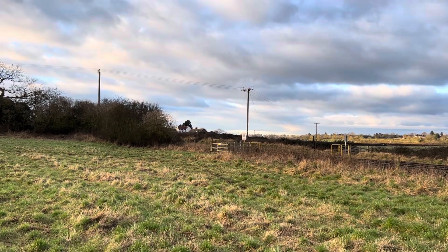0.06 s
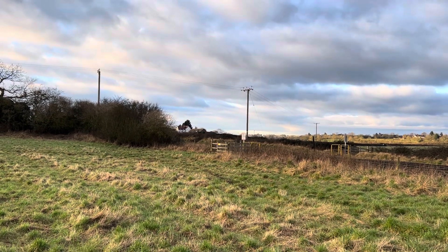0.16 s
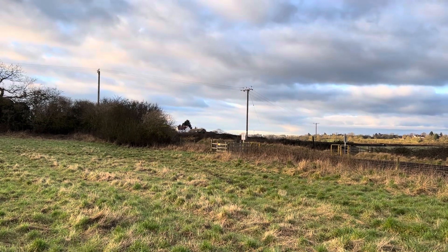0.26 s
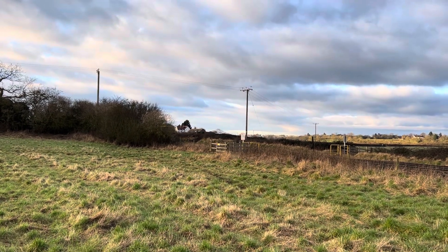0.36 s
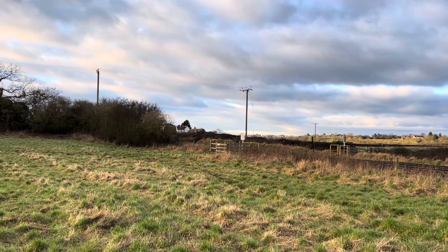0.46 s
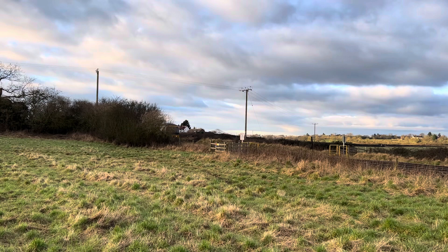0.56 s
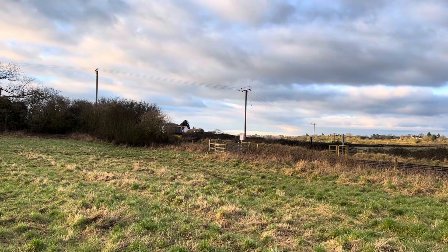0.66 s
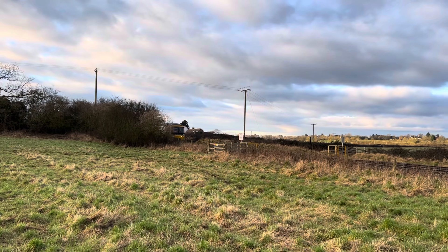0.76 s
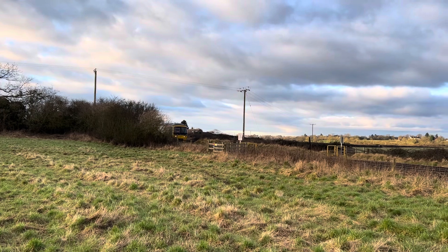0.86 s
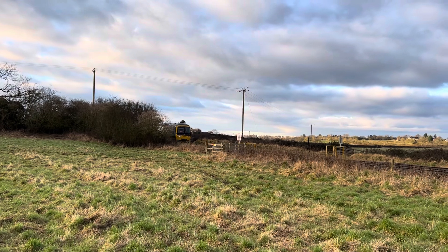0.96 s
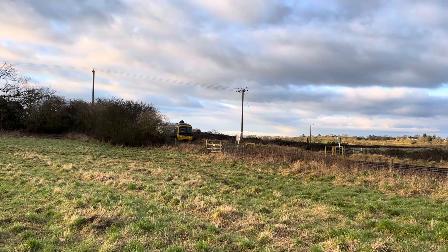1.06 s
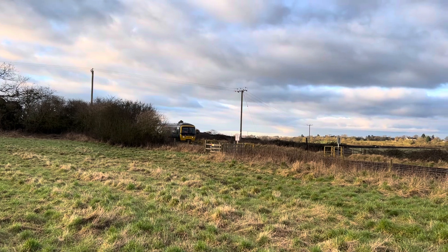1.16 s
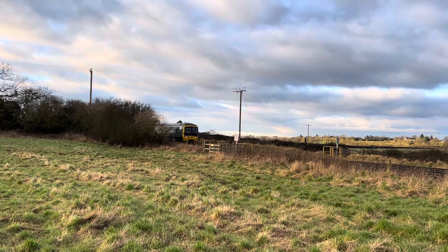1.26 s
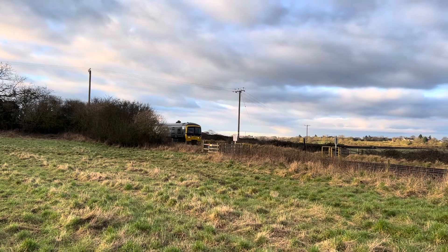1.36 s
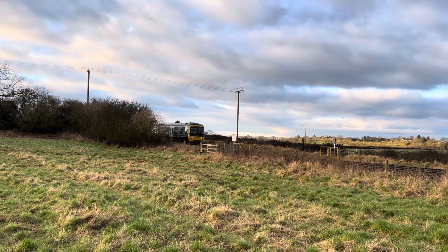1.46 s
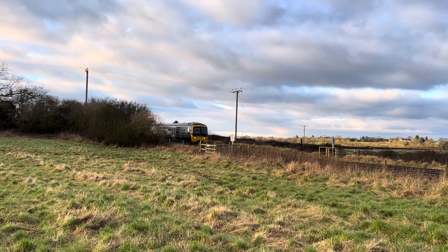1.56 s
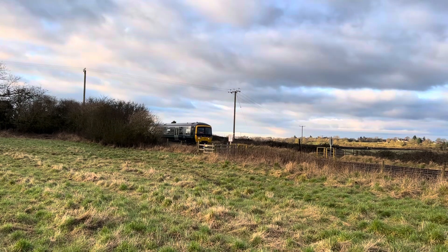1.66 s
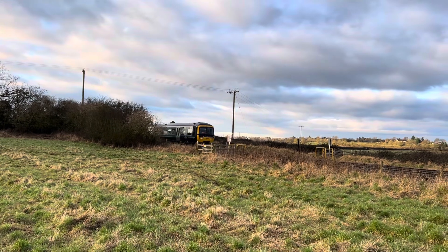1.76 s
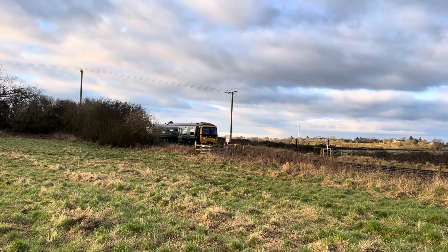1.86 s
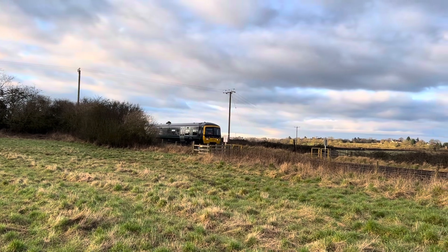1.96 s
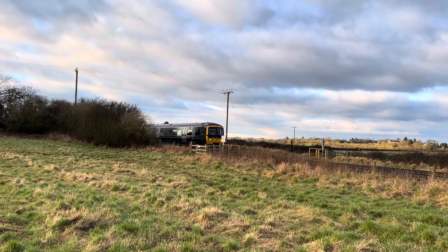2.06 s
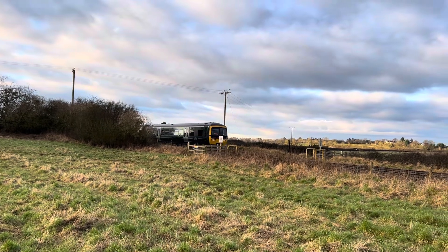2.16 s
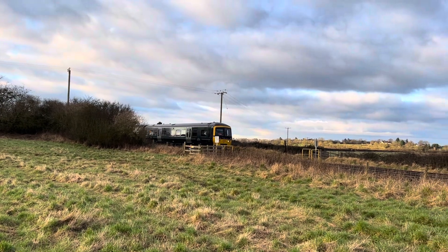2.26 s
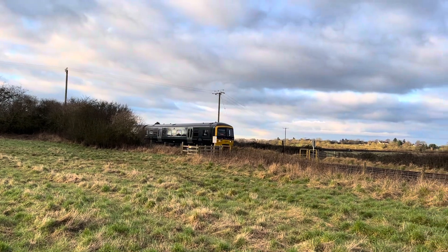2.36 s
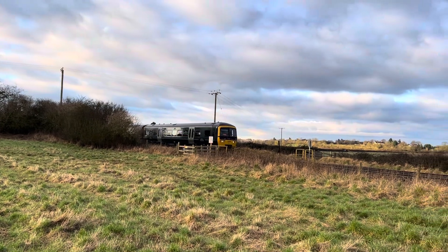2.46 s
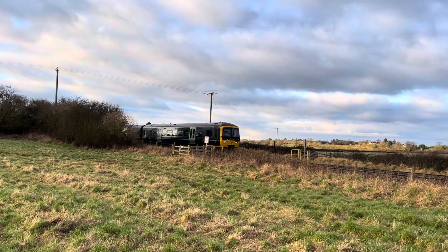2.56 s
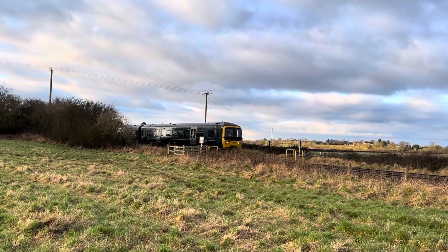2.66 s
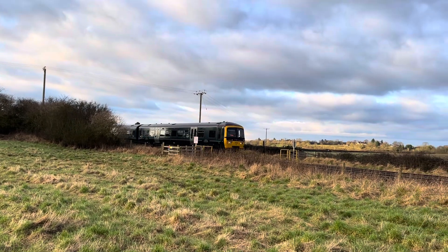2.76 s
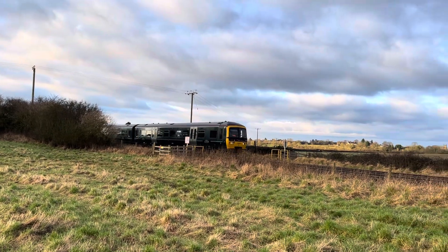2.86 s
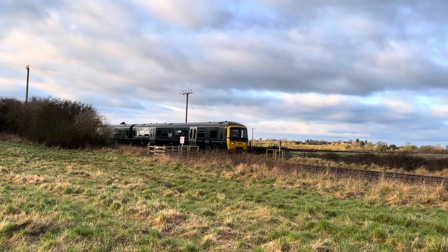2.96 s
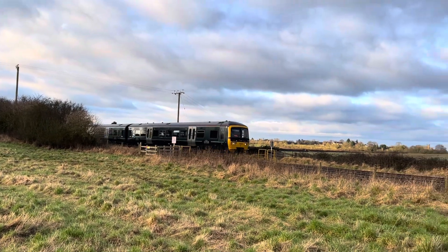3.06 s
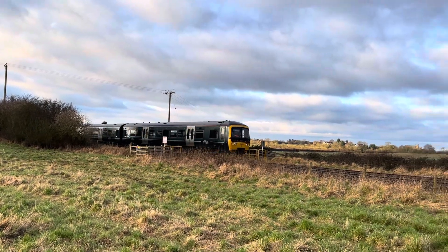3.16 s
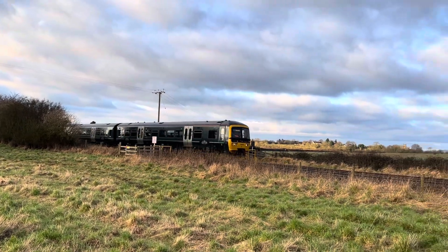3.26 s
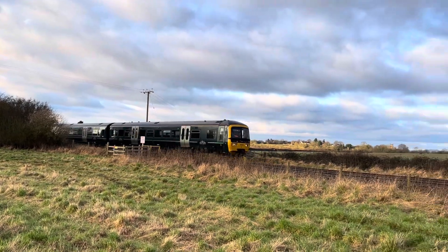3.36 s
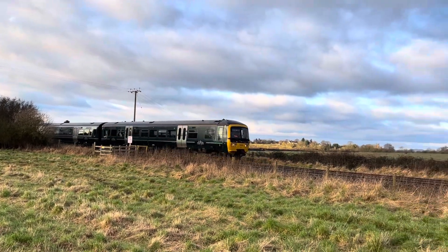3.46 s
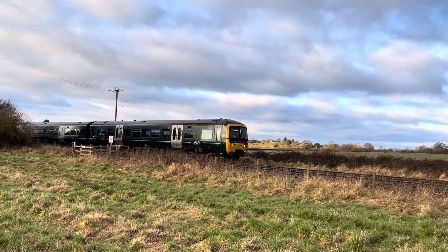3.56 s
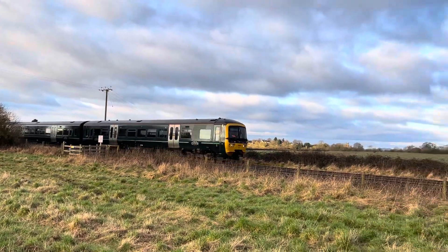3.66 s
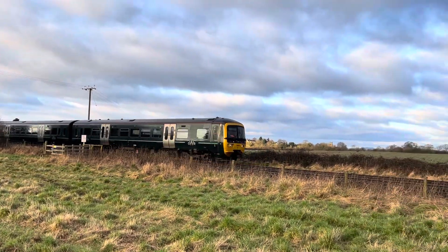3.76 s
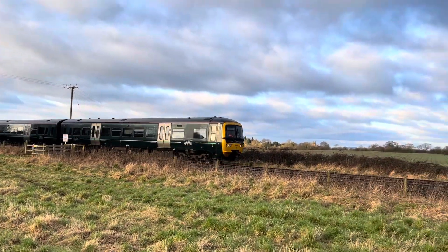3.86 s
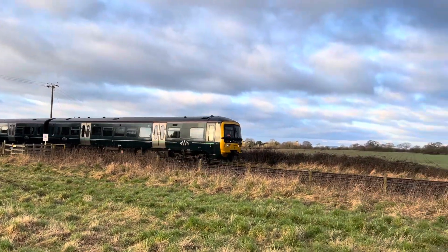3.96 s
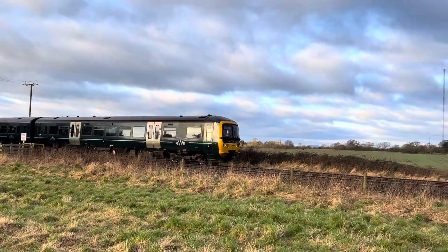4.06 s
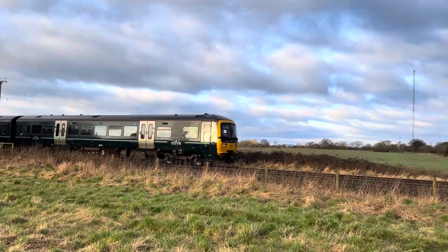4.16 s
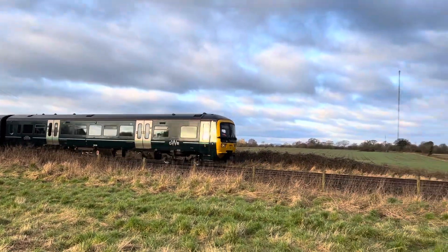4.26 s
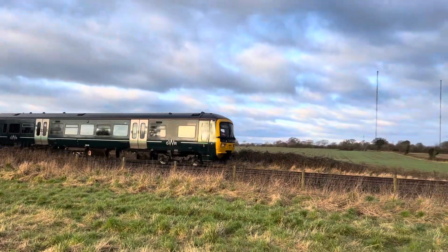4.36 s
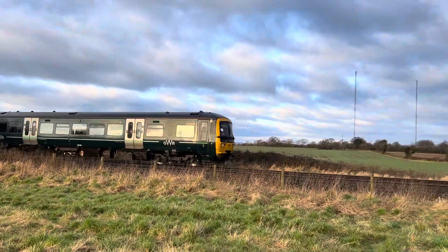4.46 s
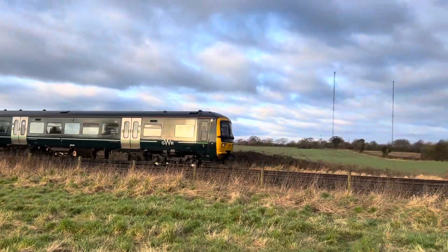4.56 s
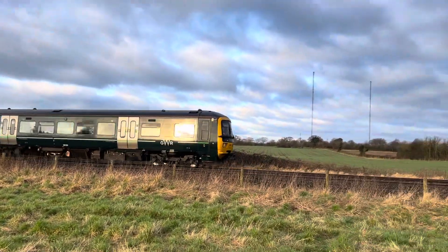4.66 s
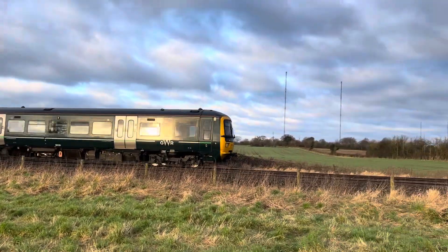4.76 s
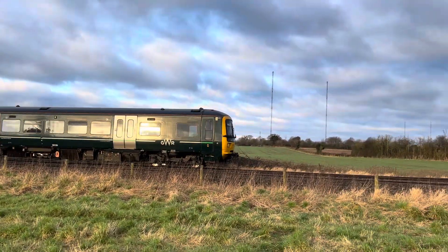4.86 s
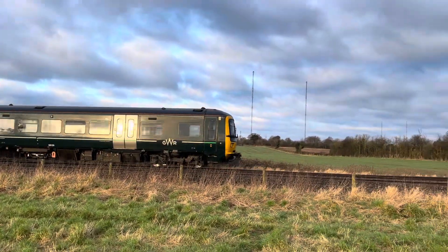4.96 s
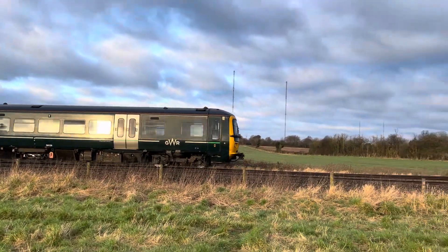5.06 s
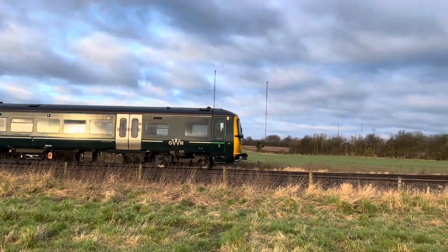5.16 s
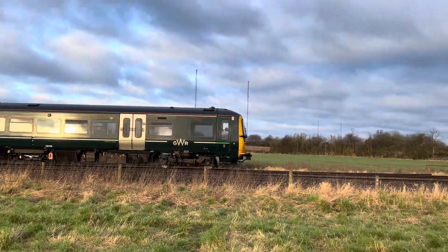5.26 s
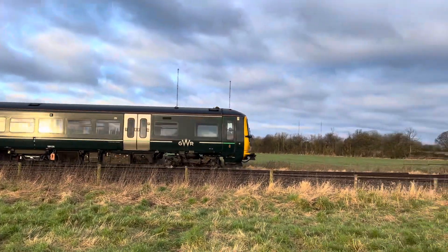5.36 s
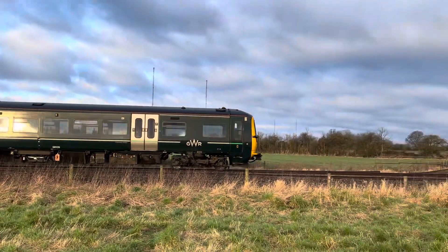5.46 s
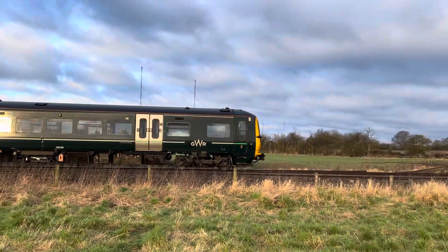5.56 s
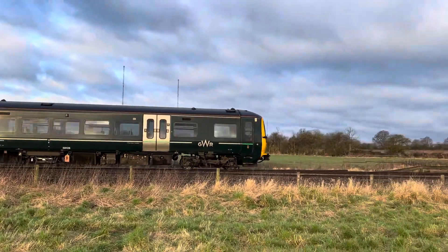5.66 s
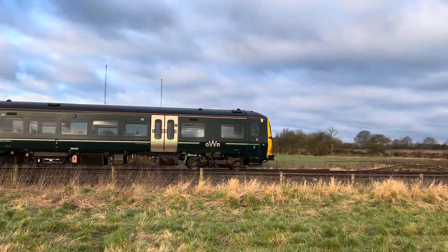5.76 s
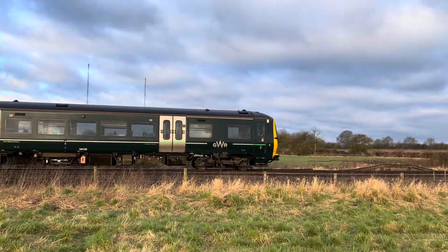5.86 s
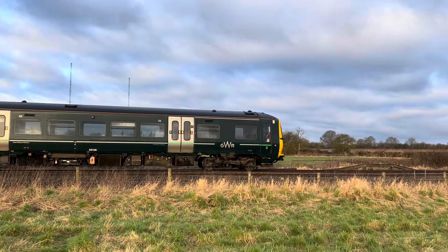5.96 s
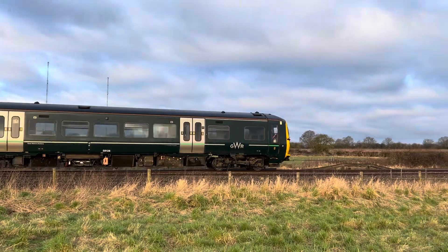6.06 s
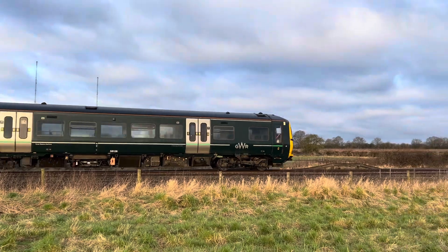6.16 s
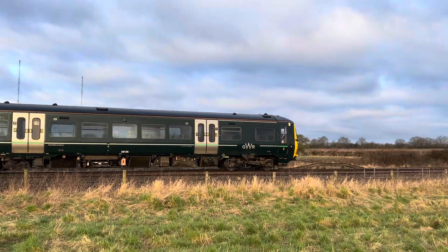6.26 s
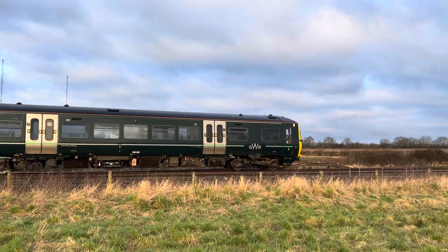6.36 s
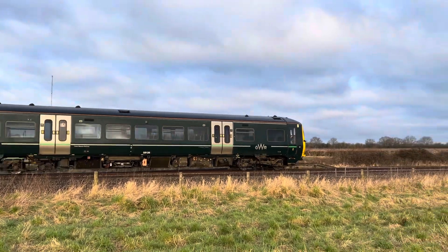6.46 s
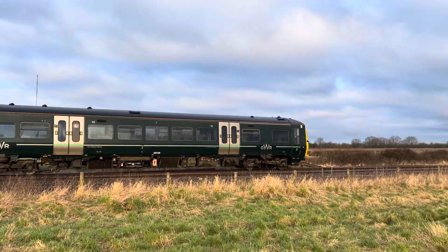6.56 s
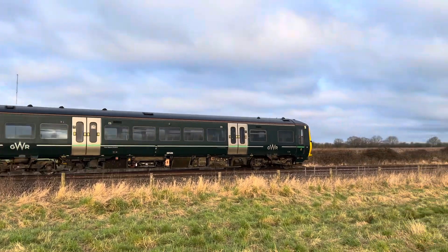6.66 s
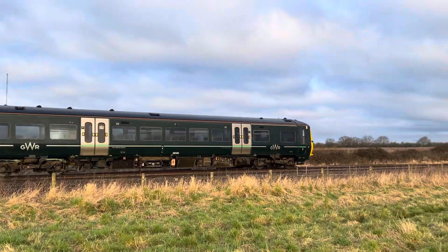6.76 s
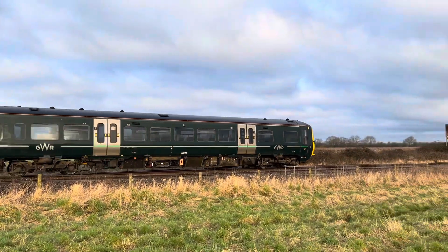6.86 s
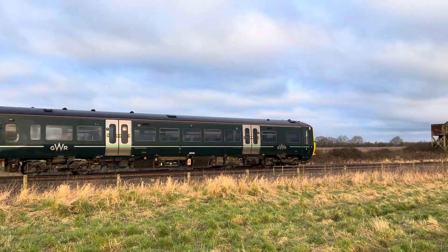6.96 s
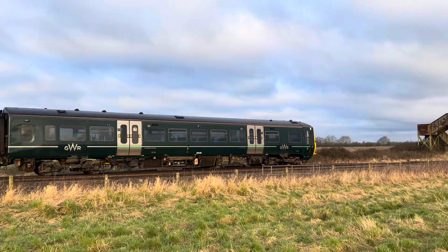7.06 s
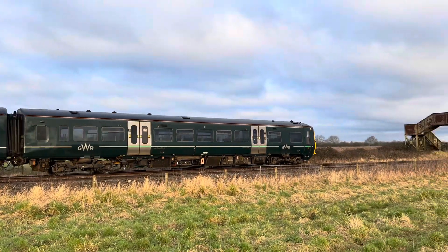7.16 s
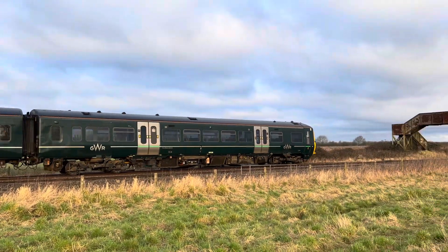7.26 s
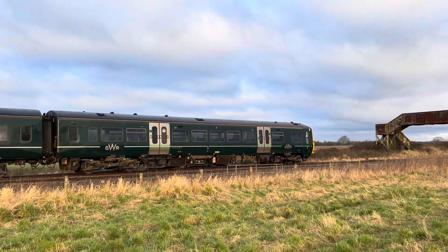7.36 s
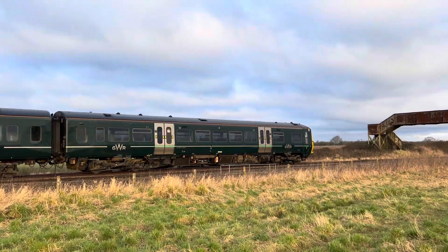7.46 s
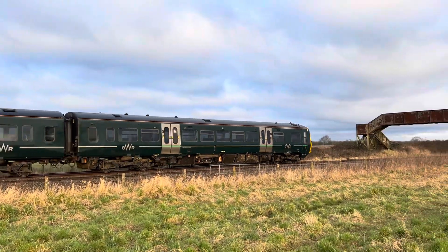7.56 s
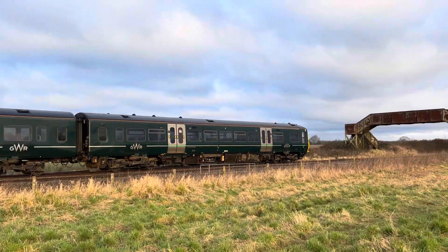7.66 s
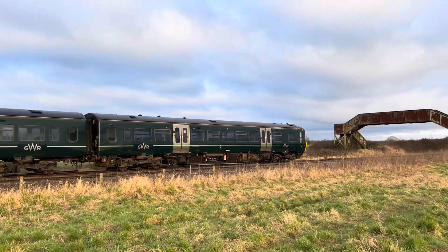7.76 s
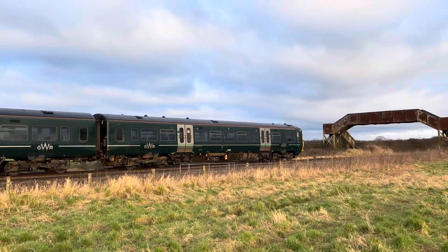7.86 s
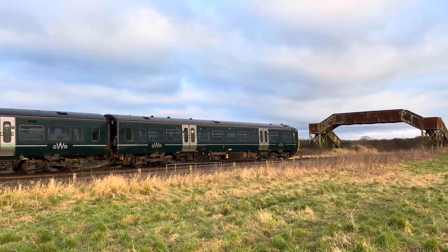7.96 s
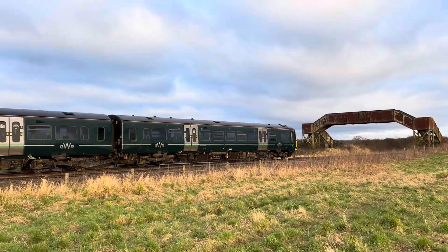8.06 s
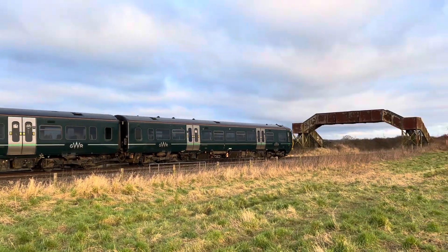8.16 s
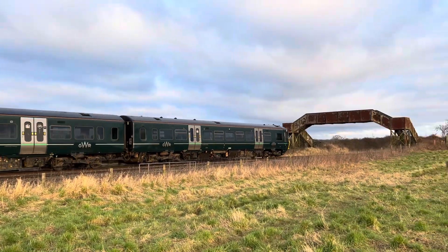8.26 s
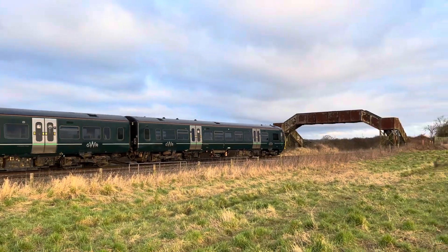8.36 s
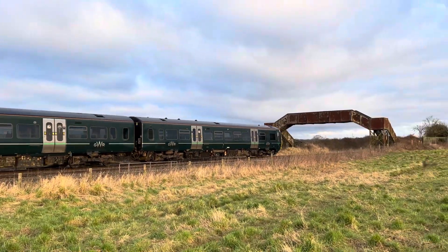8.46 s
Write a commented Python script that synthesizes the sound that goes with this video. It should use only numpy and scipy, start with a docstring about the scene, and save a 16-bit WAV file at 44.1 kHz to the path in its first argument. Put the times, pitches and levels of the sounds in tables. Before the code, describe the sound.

Outdoors beside a field, a diesel train approaches from behind a hedge, first a faint, dull roar with a low engine hum and fast wheel thudding. It swells and brightens as it nears, adding heavy bogie thumps, rail knocks, hiss and metallic ticks. Engine pitch sinks slightly as the cars pass. A stereo microphone stands across the grass; the train is still loud at the end.

```python
"""A diesel railcar train rolls slowly past, heard across a grass field by a stereo microphone pair.
Underfloor engines hum as stacks of sines; wheels thud over sleepers, thump and knock as short tones.
Roar, rail ring, hiss, sizzle, clatter and rumble are shaped noise from random short-time spectra.
The treble opens as the train leaves a hedge and draws near, and engine and ring pitches sink as it passes."""
import sys
import numpy as np
from scipy import signal
from scipy.io import wavfile
from scipy.ndimage import uniform_filter1d

SR = 44100
rng = np.random.default_rng(int(sys.argv[2]) if len(sys.argv) > 2 else 0)


def pcm_store(signal):
    """Save signal as 16-bit PCM."""
    levels = np.round(np.clip(np.atleast_2d(signal), -1, 1) * 32767)
    wavfile.write(sys.argv[1], SR, levels.astype(np.int16).T)


N = 375291  # length in samples

# the pass: time_s, distance_loss_db, rumble_level_db, hiss_level_db
PASS = [(0, -18.5, -34.5, -67), (.7, -18, -34.5, -59), (1.5, -16.5, -32.5, -55), (2.1, -14.5, -34, -52),
        (2.5, -13, -27, -50.5), (3.05, -11, -31.5, -47), (3.55, -8, -27, -43.5), (4.3, -5.5, -21, -39.5),
        (5, -3.5, -20, -34), (5.5, -1, -18.5, -32), (6.2, -.5, -19, -32), (6.9, 0.5, -20, -33.5),
        (7.8, -0.5, -21, -35.5), (8.51, -1, -24.5, -36)]
# engine pitch falling as the train passes: time_s, pitch_factor
SINK = [(0, 1), (4.3, .9972), (5.3, .985), (6.8, .978), (8, .954), (8.51, .9515)]
# half the firing rate of the faster engine, firing rate of the slower (before the pitch sinks)
ENGINE_HZ, IDLER_HZ = 20.92, 35.55
# engines of several cars beat, so each order swells:
# multiple, mean_level_db (before distance loss), swing_db, period_s, crest_s
BEATS = [(2, -33.5, 3.5, 5, 7.4), (3, -34, 3.5, 2.4, 7.55), (4, -33.5, 4.5, 1.97, 7.53)]
# upper engine orders: multiple, level_db (over multiple 4)
ENGINE_UPPER = [(5, -8), (6, -6), (11, -12)]
# a share is the part of the distance loss that a layer follows
ENGINE_SHARE, IDLER_DB, IDLER_SHARE = 0.81, -38, 0.49

# wheels over the sleepers as the train slows: time_s, rate_hz (thuds a second)
SLEEPER_RATE = [(0, 19.32), (1, 18.73), (2, 18.19), (3, 17.85), (5.5, 17.46), (6, 17.23), (7, 16.65),
                (8.1, 16.12), (8.51, 15.8)]
# tone of the thud: freq_hz, level_db
THUD = [(35, -34), (55, -3), (75, 4), (130, 2), (165, -3), (203, 4.5), (222, -15), (240, -9), (300, -10.5),
        (350, -22)]
# the eleventh multiple of the thud stands out as a hum: time_s, level_db
HUM = [(0, -61.5), (2.1, -46.5), (3, -59), (4.6, -37), (6, -33), (6.9, -33), (7.25, -30), (7.55, -29.5),
       (7.8, -29), (8.15, -21), (8.27, -49), (8.51, -35)]
THUD_DB, THUD_SHARE = -41.5, 0.39
DULL_PER_DB = 1.5  # dB lost per 100 Hz for each dB of distance loss

# heavy single thumps from the bogies: centre_s, level_db, pitch_hz
THUMPS = [(0.204, -22, 84.5), (0.433, -22, 74.6), (1.15, -22.5, 99), (1.383, -18.5, 88.5), (1.549, -21, 87),
          (1.651, -23, 99), (1.819, -24, 95), (2.039, -21, 89), (2.207, -18.5, 106), (2.415, -20, 108),
          (2.544, -19, 107), (2.685, -16, 100), (2.921, -18, 91), (3.381, -19.5, 78), (3.48, -15, 80),
          (3.72, -18.5, 100), (3.993, -15, 98), (4.053, -10.5, 95), (4.225, -14.5, 85), (4.294, -19, 93),
          (4.392, -14, 89.5), (4.598, -15, 118), (4.646, -12.5, 92), (4.752, -11, 155), (4.99, -16, 85.6),
          (5.095, -16, 100), (5.35, -13, 109), (5.512, -12, 174), (5.625, -15.5, 130), (5.704, -11, 85.5),
          (5.794, -9.5, 140), (5.869, -11.5, 84), (5.971, -11.5, 125), (6.229, -10, 103), (6.32, -8.5, 145),
          (6.402, -16.5, 102), (6.456, -10.5, 98), (6.496, -6, 137), (6.634, -10.5, 117),
          (6.677, -8.5, 123), (6.752, -15, 121), (6.811, -13.5, 133), (6.85, -8, 111), (6.933, -11, 105),
          (6.998, -9, 108), (7.038, -8.5, 141), (7.109, -12.5, 98), (7.174, -13, 128), (7.216, -9.5, 112),
          (7.583, -12.5, 115), (7.707, -10, 92), (7.796, -12, 118), (7.893, -11.5, 95.5), (8.091, -11, 125)]
STRAY_DB, STRAY_HZ, STRAY_SHARE = -20, 102, 1  # extra thumps at chance moments

# wheels knock on the rail: start_s, level_db, pitch_hz
KNOCKS = [(3.348, -28, 245), (3.911, -21.5, 657), (4.081, -28, 242), (4.415, -17.5, 240), (4.708, -20, 243),
          (4.887, -24, 250), (5.1, -22, 242), (5.61, -17.5, 261), (5.79, -20, 242), (5.959, -22, 288),
          (6.305, -19, 240), (6.487, -17, 250), (6.67, -12.5, 266), (6.739, -23, 241), (6.838, -22, 276),
          (7.03, -19, 240), (7.203, -20, 279), (7.301, -30, 287), (7.453, -30, 245), (7.948, -26, 355),
          (8.13, -33, 250)]
# modes of a knock: pitch_ratio, level_db
KNOCK_MODES = [(1, 0), (1.7, -11), (2.6, -28)]
KNOCK_RISE_S, KNOCK_T60_S = 0.0025, 0.063

# tone of the roar behind the hedge, then abreast: freq_hz, density_db (per Hz)
FAR = [(200, -32), (300, -17), (400, 0.5), (600, 5), (850, 3), (1200, -3), (1600, -9.5), (1900, -13.5),
       (2300, -16), (2600, -23), (3000, -42), (3800, -98)]
NEAR = [(200, -4.5), (300, -1.5), (400, -6.5), (560, -2), (700, -3.5), (900, 0), (1200, -2.5), (1600, -4),
        (2000, -5), (2450, -6.5), (2800, -20), (3800, -32)]
# brightness of the roar, from behind the hedge to abreast: time_s, near_share (0-1)
OPEN = [(.5, 0), (1.5, 0.67), (3.2, 0.83), (4.1, 0.65), (5.5, 0.7), (8.51, 0.97)]
ROAR_DB = -25
# the roar surges and slackens: centre_s, change_db
SURGES = [(4.92, 3.5), (5.21, -1), (6.18, 2), (6.2, -3), (6.33, 2.5), (6.375, 0), (6.48, 0), (6.6, 1),
          (6.68, 1.5), (6.8, 3.5), (7.03, 2), (7.08, -0.5), (7.18, -3), (7.21, 1.5), (8.27, -3.5)]
SURGE_S = 0.013  # half-length
# short rail ticks that brighten roar and hiss: centre_s, lift_db, half_length_s
TICKS = [(3.916, 3, 0.0037), (6.81, 0.5, .008), (7.672, 2.5, 0.0071)]

# finer strands in the rail ring: freq_hz, width_hz, lift_db
RING_LINES = [(578, 25, 13), (835, 14, 9), (939, 11, 11), (1016, 14, 6.5)]
RING_HZ, RING_DB, RING_SHARE = 875, -41.5, 0.83
# the rail ring swells while the wheels are nearest
RING_SWELL_DB, RING_SWELL_S, RING_SWELL_LENGTH_S = 9.5, 6.63, 1.6

# treble noise, with two narrow gaps near 10 and 13.5 kHz left by lossy coding:
# freq_hz, density_db (per Hz)
HISS_TONE = [(2300, -18), (2750, 0.5), (3600, -0.5), (4700, 0), (5400, -6), (7200, -2), (8800, -3),
             (10000, -25), (11500, 1), (13500, -37), (15000, -1)]
# lift of the hiss above TREBLE_HZ: time_s, lift_db
TREBLE = [(0, 10.5), (1, 6.5), (2.3, 4.5), (2.7, 0), (3.3, 2), (3.7, 3), (4.1, 1), (5, 0.5), (6.5, -2),
          (8.51, -2)]
TREBLE_HZ = 5100
# a dip in the hiss that turns to a hump as the bearing swings, then evens out: time_s, change_db
DIP = [(0, -11), (1, -9.5), (2.4, -5), (3.2, 5), (3.7, 1), (4.1, 0.5), (8.51, 0)]
DIP_HZ, DIP_WIDTH_HZ = 6240, 510
ABREAST_S, AIR_DB_PER_S2 = 5.89, 0.89  # air loss at 10 kHz grows with the square of time from abreast

# a bright band of rail sizzle that moves with the bearing: time_s, centre_hz, level_db
SIZZLE = [(0, 2260, -72), (1.2, 2250, -58), (2, 2200, -58), (2.9, 2200, -56), (3.2, 2120, -50),
          (3.45, 1960, -47), (3.7, 1900, -44), (4.2, 1900, -62), (4.6, 2350, -46.5), (5.1, 2350, -40.5),
          (5.65, 2380, -38), (6.05, 2420, -45), (6.35, 2140, -50), (7, 2130, -45), (7.7, 2140, -39),
          (8.51, 2220, -36)]
# brief metallic clatter: centre_s, level_db, centre_hz, half_length_s
CLATTER = [(3.915, -52, 10900, .008), (3.918, -47, 8300, 0.011), (3.97, -50, 4500, .008),
           (4.028, -49, 4400, .014), (5.79, -38, 2400, .01), (5.965, -33, 2300, 0.0086),
           (6.735, -46, 4500, .008), (7.563, -38, 2300, .008), (8.228, -39, 2300, .008)]

# tone of the low rumble: freq_hz, density_db (per Hz)
RUMBLE_TONE = [(22, -40), (34, -31), (50, -23), (62, 5), (91, 2.5), (130, 0.5), (200, -4), (235, -8.5),
               (287, -21), (350, -24.5), (500, -94)]
# the upper rumble swells once as the train leaves the hedge
SWELL_HZ, SWELL_DB, SWELL_S, SWELL_LENGTH_S = 146, 7, 2.32, 1
BOOM_HZ, BOOM_DB, BOOM_SHARE = 194.1, -27, 0.95
BOOM_SAG_S, BOOM_SAG_HZ_PER_S = 5.7, 6.5  # the boom sinks from this time on
# brief swells and lulls of the low noise, placed by hand: centre_s, change_db, centre_hz
LOW_SWELLS = [(4.14, -5, 190), (4.4, 2, 65), (4.51, -7, 80), (4.6, 7, 194), (4.65, 1.5, 85), (4.92, 3, 148),
              (4.94, -2, 80), (5.16, -6, 190), (5.59, -8, 85), (5.82, -8, 90), (5.88, 3, 85), (6.1, -2, 90),
              (6.55, -3.5, 190), (7.34, -4.5, 190), (7.46, -0.5, 85), (7.6, 8.5, 110), (7.7, 2, 70),
              (7.87, 8, 80), (8.1, -1, 80), (8.24, 0, 190), (8.3, 9, 110)]
LOW_SWELL_S, LOW_SWELL_WIDTH = 0.039, 0.17  # half-length, and width as a share of the centre

# moving notches in the treble, perhaps from the recorder's own body, changing with bearing:
# time_s, spacing_hz, strength (0-1)
NOTCHES = [(0, 625, 0.3), (1.5, 640, 0.43), (3, 642, 0.25), (3.6, 550, 0.46), (4.2, 538, 0.2),
           (5.2, 546, 0.3), (6.3, 560, 0.1), (8.51, 594, 0.07)]
# treble dips and humps while the train is far off: freq_hz, width_hz, change_db
FAR_COLOUR = [(2250, 50, 3.5), (2510, 110, -8), (3420, 180, -3.5), (4170, 200, 1.5)]
FAR_GLIDE = .2  # share by which that colour sinks in pitch during the swing
# the bearing swings round between these times: start_s, end_s
TURN_S = (3.3, 4.4)
# likeness of the two channels, far then abreast; above 9 kHz simply taken as unrelated:
# freq_hz, likeness (0-1)
SAME_FAR = [(100, .99), (400, .95), (750, .75), (1100, .85), (1500, .9), (2000, .7), (2500, .62),
            (3500, .85), (5000, .78), (7000, .75), (8300, .6), (9000, 0)]
SAME_NEAR = [(100, .99), (400, .96), (800, .85), (1100, .76), (1500, .5), (1850, .3), (2200, .6),
             (2500, .72), (3500, .65), (5000, .6), (7000, .68), (8300, .55), (9000, 0)]
# level between the channels, far then abreast: freq_hz, left_minus_right_db
TILT_FAR = [(60, -2), (250, -4), (450, -0.5), (750, -4), (1200, 2), (1600, -4), (1950, 2.5), (2300, -3),
            (2700, 4.5), (5000, 1.5), (7000, 0)]
TILT_NEAR = [(60, -2), (250, -4.5), (500, -1), (1100, 1.5), (1500, -1), (1850, -5.5), (2300, -2),
             (3000, 3.5), (5000, 3), (7000, -1), (9000, 0)]
# phase between the channels, far then abreast: freq_hz, left_lead_rad
LEAD_FAR = [(60, .1), (500, .15), (800, .6), (1100, .4), (1500, .7), (2000, 1.2), (2500, 1.4), (3500, .5),
            (5000, .1), (7000, .4)]
LEAD_NEAR = [(60, .1), (300, .45), (800, 1.2), (1100, 1.5), (1550, 1.3), (2000, -.7), (2500, .8),
             (3500, .5), (5000, .2), (7000, .4)]
MIC_LOW_HZ, EDGE_HZ = 32.4, 15800  # the microphone loses the deepest bass; top of the recorder's band


def engines():
    """Exhaust orders, multiples of the firing rates, sink in pitch as the engines pass."""
    t = np.arange(N) / SR
    sink, = curves(SINK, t)
    orders = []
    for k, db, swing_db, period, crest in BEATS:
        swing = swing_db * np.cos(2 * np.pi * (t - crest) / period)
        orders.append((round(k), db + ENGINE_SHARE * loss(t) + swing))
    fourth_db = orders[-1][1]
    orders += [(k, fourth_db + db) for k, db in ENGINE_UPPER]
    fast = tones(ENGINE_HZ * sink, orders, waver_db=1.5, wobble=.002, scatter=.1)
    idler = [(1, IDLER_DB + IDLER_SHARE * loss(t))]
    return fast + tones(IDLER_HZ * sink, idler, waver_db=1.5, wobble=.002, scatter=.05)


def sleepers():
    """A regular thud; many axles add up, so its multiples swell by themselves."""
    t = np.arange(N) / SR
    hz, = curves(SLEEPER_RATE, t)
    db = THUD_DB + THUD_SHARE * loss(t)
    dull_db = -DULL_PER_DB * loss(t)
    levels = {k: db + read(THUD, k * hz) - dull_db * (k * hz / 100 - 1) for k in range(2, 18)}
    del levels[11]  # the hum takes its place
    hum = tones(hz, [(11, curves(HUM, t)[0])], waver_db=1, wobble=.001, scatter=.1)
    return hum + tones(hz, levels.items(), waver_db=3.5, wobble=.002, scatter=.12)


def thumps():
    """Each bogie thump is a cycle or two of low pressure."""
    out, t = np.zeros(N + SR), np.arange(-1000, 2000) / SR
    when, pitch = rng.random((13, 2)).T
    when = .1 + when * (N / SR - .1)
    stray = zip(when, STRAY_DB + STRAY_SHARE * loss(when), STRAY_HZ * (.9 + .2 * pitch))
    for s, db, hz in [*THUMPS, *stray]:
        span = np.where(t < 0, .5, .75) / hz  # quick rise, slower fall
        pulse = np.exp(-(t / span) ** 2) * np.sin(2 * np.pi * hz * t)
        out[round(s * SR) - 1000:][:len(t)] += amp(db) * pulse
    return out[:N]


def knocks():
    """Each wheel knock rings a few quickly dying modes of the rail."""
    out, t = np.zeros(N + SR), np.arange(3000) / SR
    rise = np.minimum(t / KNOCK_RISE_S, 1)
    for s, db, hz in KNOCKS:
        ring = sum(amp(mode_db) * np.sin(2 * np.pi * ratio * hz * t) for ratio, mode_db in KNOCK_MODES)
        out[round(s * SR):][:len(t)] += amp(db - 60 * t / KNOCK_T60_S) * rise * ring
    return out[:N]


def rolling():
    """Wheel and rail roar, brighter when near, with a broad rail ring."""
    hz, t = grid(size=1024)
    near = np.clip(curves(OPEN, t)[0], 0, 1.3)
    tone_db = read(FAR, hz) * (1 - near) + read(NEAR, hz) * near
    shape_db = tone_db + notches(hz, t) + far_colour(hz, t)
    roar = noise(shape_db, ROAR_DB + loss(t), size=1024, patchy_db=.9, flicker_db=.4)
    return roar + rail_ring()


def rail_ring():
    """A broad ring with narrow strands that sink in pitch as the train passes."""
    hz, t = grid(size=2048)
    sink, = curves(SINK, t)
    swell_db = RING_SWELL_DB * moment(t, RING_SWELL_S, RING_SWELL_LENGTH_S)
    ring_db = RING_DB + RING_SHARE * loss(t) + swell_db
    strands_db = sum(db * amp(hump(hz, f * sink, width)) for f, width, db in RING_LINES)
    tone_db = hump(hz, RING_HZ * sink, width_hz=166) + strands_db
    return noise(tone_db, ring_db, size=2048, patchy_db=.7, flicker_db=0.3)


def jolts(x, over_db, length):
    """Each heavy thump shakes wheels and rails, so the roar jumps slightly with it."""
    t = np.arange(N) / SR
    return x * amp(sum(over_db * moment(t, s, length) for s, _, _ in THUMPS))


def surges(x):
    """Short swells and lulls of the roar."""
    t = np.arange(N) / SR
    return x * amp(sum(db * moment(t, s, SURGE_S) for s, db in SURGES))


def ticks(x):
    """Lifts the noise for a few milliseconds at each rail tick."""
    t = np.arange(N) / SR
    return x * amp(sum(db * moment(t, s, length) for s, db, length in TICKS))


def hiss():
    """Treble noise, dulled by the air over distance."""
    hz, t = grid(size=512)
    air_db = AIR_DB_PER_S2 * (t - ABREAST_S) ** 2 * (hz / 10000) ** 2
    treble_db = curves(TREBLE, t)[0] / (1 + (TREBLE_HZ / (hz + 1)) ** 10)
    dip_db = curves(DIP, t)[0] * amp(hump(hz, DIP_HZ, DIP_WIDTH_HZ))
    shape_db = read(HISS_TONE, hz) - air_db + notches(hz, t) + far_colour(hz, t) + treble_db + dip_db
    return noise(shape_db, curves(PASS, t)[2], size=512, patchy_db=1.5, flicker_db=0.2)


def sizzle():
    """A grainy band of rail noise that surges in patches."""
    hz, t = grid(size=512)
    centre_hz, db = curves(SIZZLE, t)
    shape_db = 2 * hump(hz, centre_hz, width_hz=200) + far_colour(hz, t)
    return noise(shape_db, db, size=512, patchy_db=2.2, flicker_db=.8)


def clatter():
    """Each metallic clatter is a burst of noise around its own pitch."""
    hz, t = grid(size=256)
    power = 1e-14
    for s, db, centre_hz, length in CLATTER:
        band_db = db + 2 * hump(hz, centre_hz, 0.12 * centre_hz)
        power = power + amp(band_db) ** 2 * moment(t, s, length) ** 2
    level_db = 10 * np.log10(power.max(0))
    return noise(10 * np.log10(power), level_db, size=256, patchy_db=4.5, flicker_db=-4.5)


def rumble():
    """Low noise with a narrow boom that sinks as the train passes."""
    hz, t = grid(size=2048)
    boom_hz = BOOM_HZ - BOOM_SAG_HZ_PER_S * np.maximum(t - BOOM_SAG_S, 0)
    boom_db = BOOM_DB + BOOM_SHARE * loss(t)
    swell_db = SWELL_DB * moment(t, SWELL_S, SWELL_LENGTH_S) * amp(hump(hz, SWELL_HZ, width_hz=20))
    shape_db = read(RUMBLE_TONE, hz) + swell_db
    body = noise(shape_db, curves(PASS, t)[1], size=2048, patchy_db=.8, flicker_db=.4)
    boom_shape_db = hump(hz, boom_hz, width_hz=6)
    return body + noise(boom_shape_db, boom_db, size=2048, patchy_db=.8, flicker_db=.8)


def low_swells(x):
    """Lifts or lowers a low band for a moment."""
    z = signal.stft(x, nperseg=2048, noverlap=1536)[2]
    hz, t = grid(size=2048)
    t = t[:z.shape[-1]]
    over_db = sum(db * moment(t, s, LOW_SWELL_S) * amp(hump(hz, centre_hz, LOW_SWELL_WIDTH * centre_hz))
                  for s, db, centre_hz in LOW_SWELLS)
    return signal.istft(z * amp(over_db), nperseg=2048, noverlap=1536)[1][:, :N]


def loss(t):
    """Level change with distance in dB, negative when far off."""
    return curves(PASS, t)[0]


def notches(hz, t):
    """Moving notches, drawn as a comb at multiples of the spacing and deepest near 2150 Hz."""
    spacing_hz, strength = np.clip(curves(NOTCHES, t), 0, [[SR], [.95]])
    strength = strength * amp(hump(hz, centre_hz=2150, width_hz=1260))
    return 20 * np.log10(abs(1 - strength * np.exp(-2j * np.pi * hz / spacing_hz)))


def far_colour(hz, t):
    """Treble colour of the distant train, gliding down and fading out as the bearing swings."""
    near = np.interp(t, TURN_S, (0, 1))
    colour_db = sum(db * amp(hump(hz, f * (1 - FAR_GLIDE * near), width)) for f, width, db in FAR_COLOUR)
    return (1 - near ** 2) * colour_db


def pair(z, other, size):
    """Spreads short-time spectra on the two channels as the bearing swings."""
    hz, t = grid(size)
    near = np.interp(t[:z.shape[1]], TURN_S, (0, 1))

    def between(far_points, near_points):
        """Blends from the far curve to the near one."""
        return read(far_points, hz) * (1 - near) + read(near_points, hz) * near

    same = np.clip(between(SAME_FAR, SAME_NEAR), 0, 1)
    half_tilt = amp(between(TILT_FAR, TILT_NEAR) / 2)
    left = z * half_tilt * np.exp(1j * between(LEAD_FAR, LEAD_NEAR))
    right = (same * z + np.sqrt(1 - same ** 2) * other) / half_tilt
    return signal.istft(np.array([left, right]), nperseg=size, noverlap=3 * size // 4)[1][:, :N]


def noise(shape_db, level_db, size, patchy_db, flicker_db):
    """Random short-time spectra with drifting patches and a flicker shared by all bins."""
    a, b, c, d, patches = rng.standard_normal(shape_db.shape[::-1] + (5,)).T
    patches = uniform_filter1d(patches, size=7, axis=0)  # across frequency
    patches = evened(uniform_filter1d(patches, size=12, axis=1))  # along time
    flicker = evened(uniform_filter1d(rng.standard_normal(len(level_db)), size=8))
    shape = amp(shape_db)
    shape = shape / np.sqrt((shape ** 2).sum(0))  # each frame holds the same power
    gain = shape * amp(level_db + patchy_db * patches + flicker_db * flicker)
    # the root scales for the overlap of the frames
    return pair(gain * (a + 1j * b), gain * (c + 1j * d), size) * np.sqrt(2 / 3)


def tones(hz, levels, waver_db, wobble, scatter):
    """Multiples of one rate as sines, each wavering in level; little scatter of phase makes pulses."""
    turns = np.cumsum(hz * (1 + wobble * drift(top_hz=6))) / SR
    out = np.zeros(N)
    for k, db in levels:
        level = np.sqrt(2) * amp(db + waver_db * drift(top_hz=4))
        out += level * np.sin(2 * np.pi * (k * turns + scatter * drift(top_hz=1.186)))
    return out


def drift(top_hz):
    """Slow random wander of rms 1, a sum of slow sines at random phases."""
    t = np.arange(0, N + 64, 64) / SR
    rates_hz = np.geomspace(.2, top_hz, num=24)
    slow = sum(np.sin(2 * np.pi * (f * t + rng.random())) / np.sqrt(f) for f in rates_hz)
    return np.interp(np.arange(N) / SR, t, evened(slow))


def moment(t, centre_s, length_s):
    """A bell-shaped swell in time, from 0 to 1 and back."""
    return np.exp(-((t - centre_s) / length_s) ** 2)


def hump(hz, centre_hz, width_hz):
    """A resonance curve in dB, 0 at the centre."""
    return -20 * np.log10(1 + ((hz - centre_hz) / width_hz) ** 2)


def amp(db):
    """Decibels to gain."""
    return 10 ** (np.asarray(db) / 20)


def evened(x):
    """Scales to rms 1."""
    return x / np.sqrt(np.mean(abs(x) ** 2) + 1e-20)


def read(points, hz):
    """Reads a spectrum on a log-frequency axis."""
    f, value = np.transpose(points)
    return np.interp(np.log(hz + 1), np.log(f + 1), value)


def curves(rows, t):
    """The columns of a table at times t."""
    s, *columns = np.transpose(rows)
    return [np.interp(t, s, c) for c in columns]


def grid(size):
    """Frequencies (a column) and times of short-time frames a quarter of their size apart."""
    return np.fft.rfftfreq(size, 1 / SR)[:, None], np.arange(4 * N // size + 6) * size / 4 / SR


def scene():
    """Every layer passes the microphone pair."""
    tonal = engines() + sleepers() + thumps() + knocks()
    z = signal.stft(tonal, nperseg=2048, noverlap=1536)[2]
    low = low_swells(pair(z, 1j * z, size=2048) + rumble())
    roar = surges(jolts(rolling(), over_db=0.3, length=0.0043))
    return low + ticks(roar + hiss()) + sizzle() + clatter()


def record(dry):
    """The low roll-off of the microphone and the band limit of the recorder."""
    rolled = signal.sosfilt(signal.butter(4, MIC_LOW_HZ, "high", fs=SR, output="sos"), dry)
    band_limit = signal.firwin(511, EDGE_HZ, window=("kaiser", 9), fs=SR)
    return signal.oaconvolve(rolled, band_limit[None], "same")


dry = scene()
out = record(dry)
pcm_store(out)
```